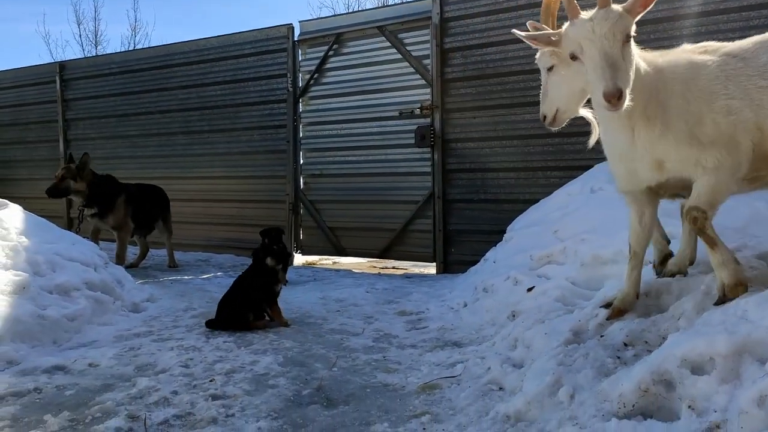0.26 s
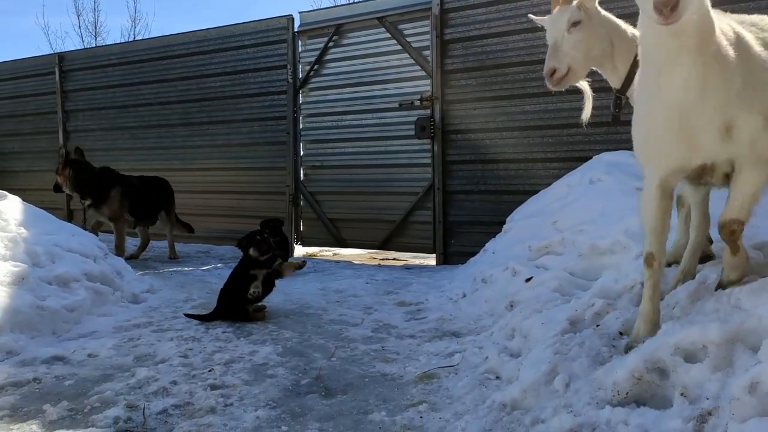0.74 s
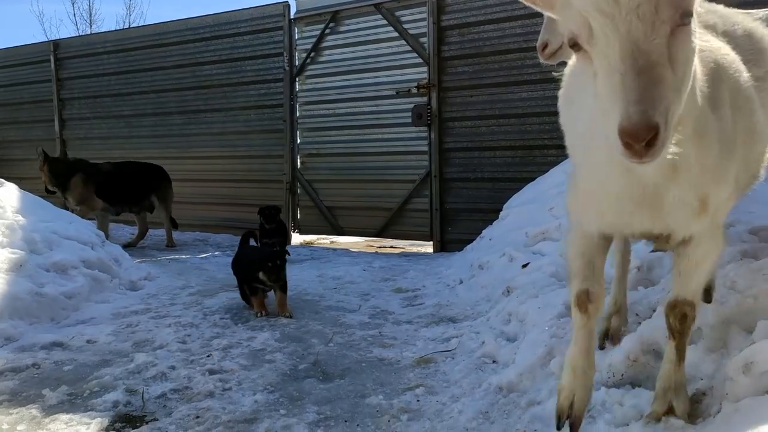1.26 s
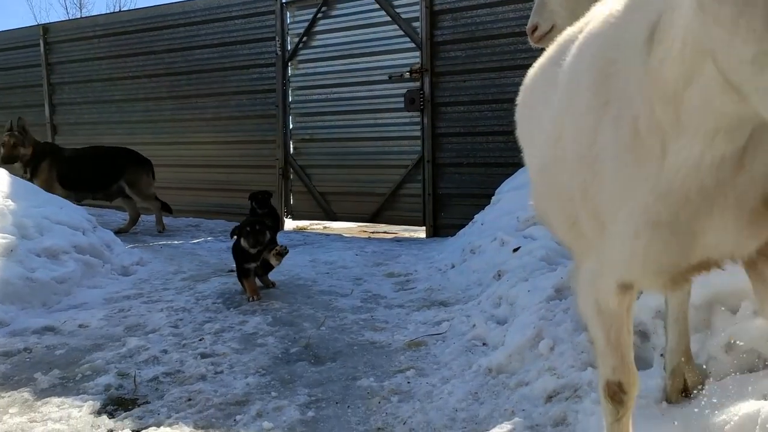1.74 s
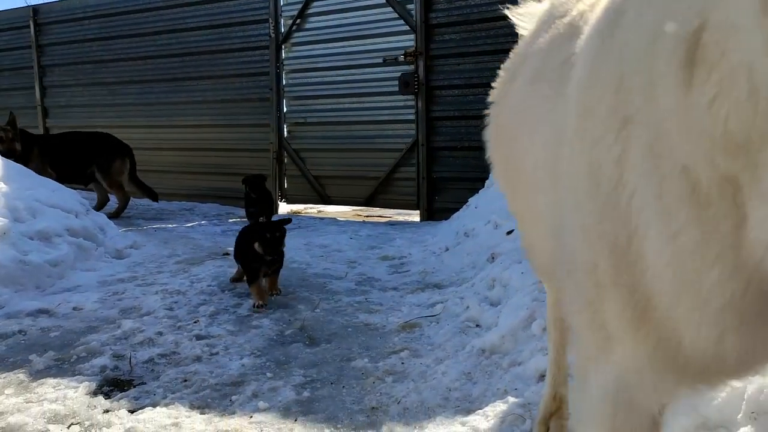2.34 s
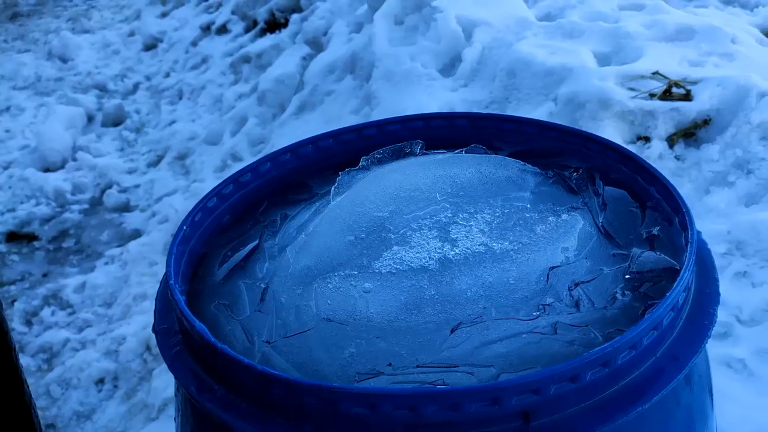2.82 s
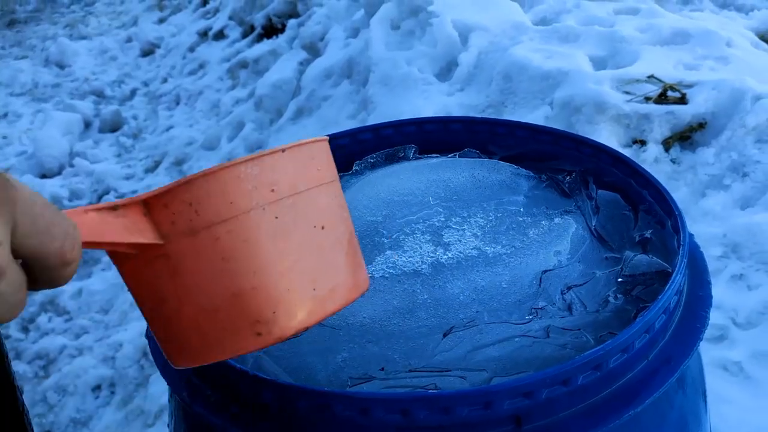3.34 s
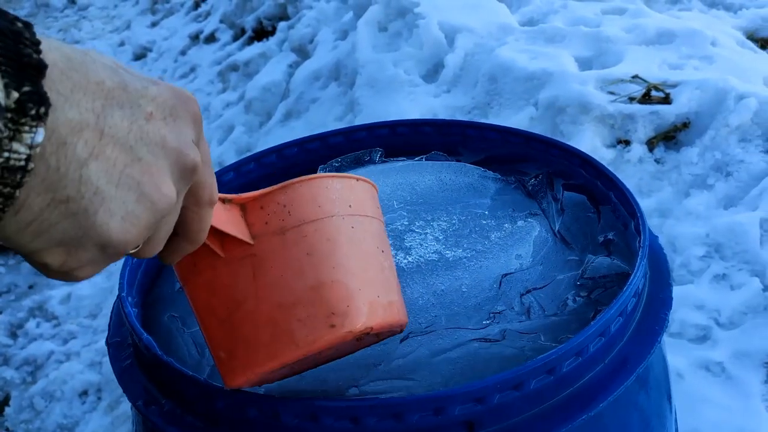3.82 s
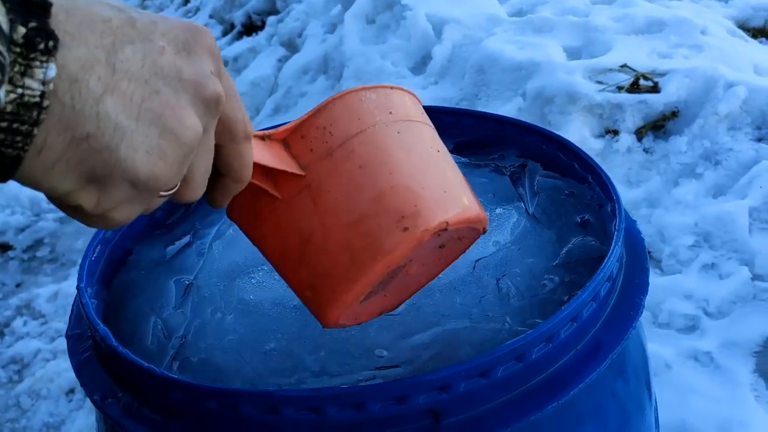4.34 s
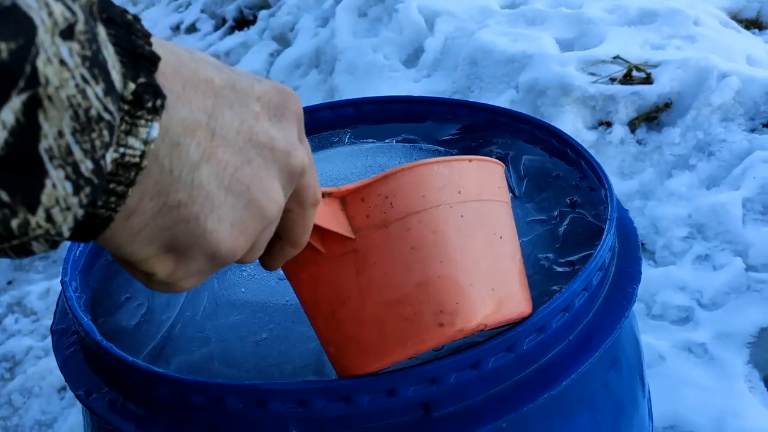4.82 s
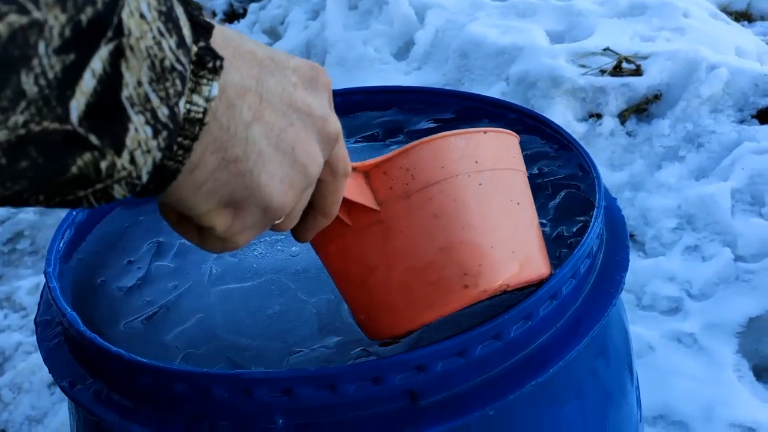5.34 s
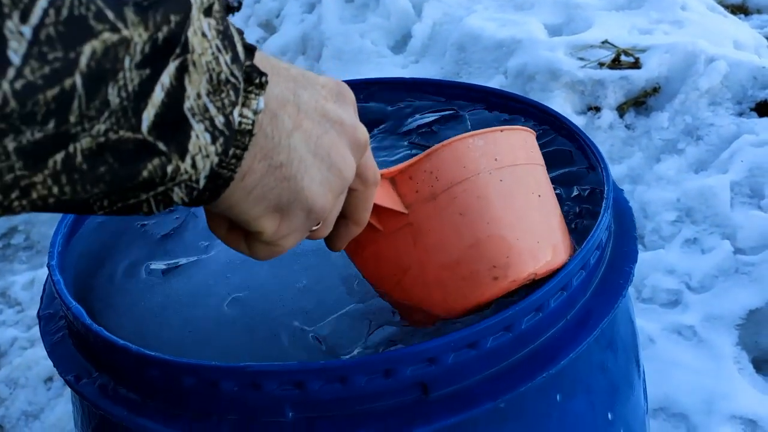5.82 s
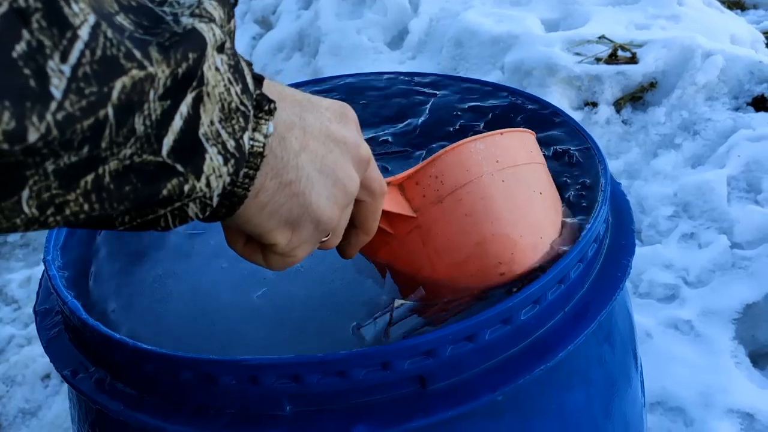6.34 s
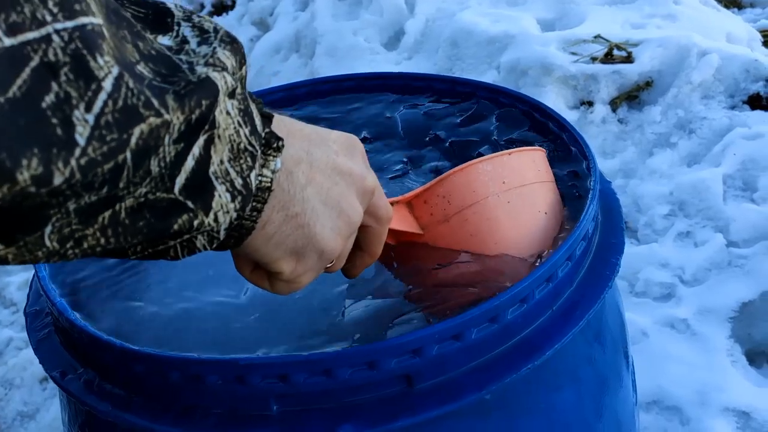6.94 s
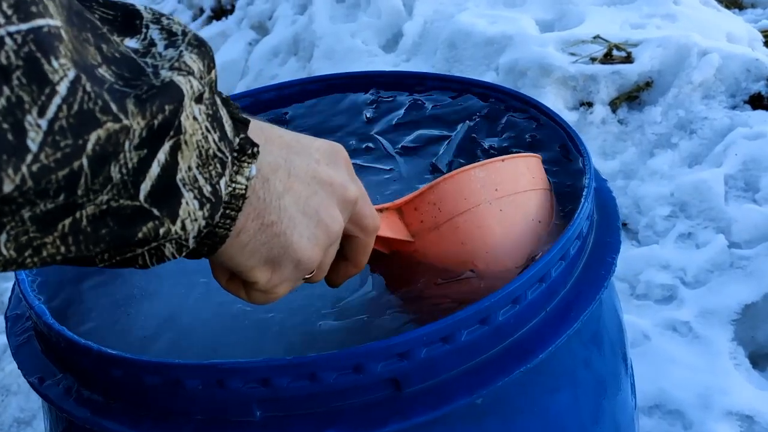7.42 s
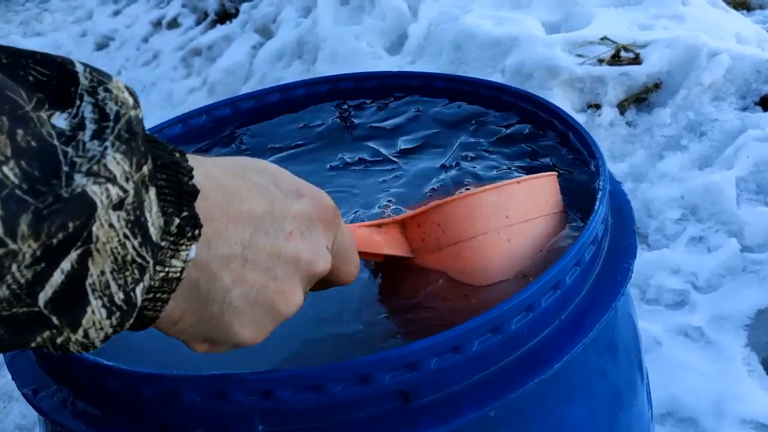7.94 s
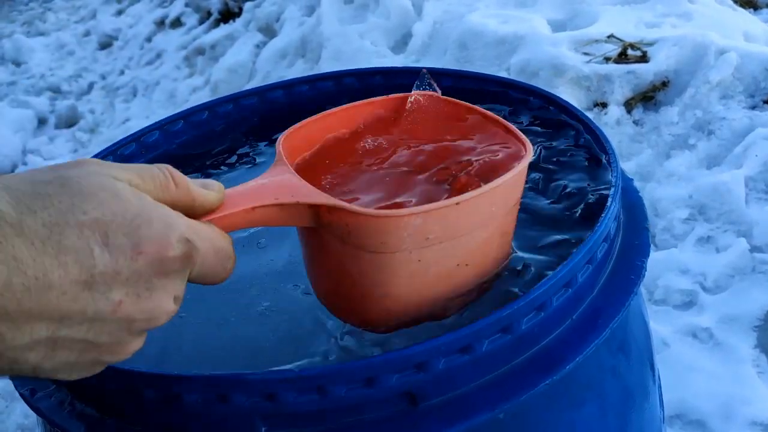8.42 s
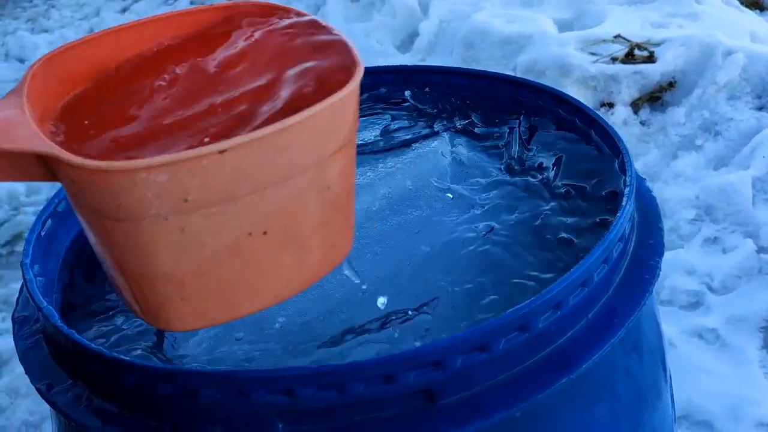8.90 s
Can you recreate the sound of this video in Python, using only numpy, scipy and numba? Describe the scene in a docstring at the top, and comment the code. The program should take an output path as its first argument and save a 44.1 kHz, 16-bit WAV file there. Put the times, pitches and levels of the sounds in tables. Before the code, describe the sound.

Dogs whine thinly as a goat crunches through snow and brushes the microphone; then a plastic scoop knocks, cracks barrel ice and fills with gurgling water.

```python
"""A plastic scoop knocks on thin ice in a water barrel, breaks it, and sinks among crackling shards.
Tiny fractures excite its hollow, plastic wall and the ice edge; the hollow's pitch climbs as water fills it, then
falls back among bubbles and drips as it is lifted out. Before that, and a brief silence, a goat crunches up
through snow in grains of noise and brushes past the left microphone, while dogs whine in gliding overtones.
Faint yard air and light wind on the microphones lie behind it all."""
import sys
import numpy as np
from scipy import signal
from scipy.fft import rfft, irfft
from scipy.io import wavfile
from scipy.ndimage import uniform_filter1d
from numba import njit

SR = 44100
rng = np.random.default_rng(int(sys.argv[2]) if len(sys.argv) > 2 else 0)


def bounce(signal):
    """Save signal as a 16-bit WAV file at the path given by the first command-line argument."""
    frames = np.transpose(np.atleast_2d(signal))
    limited = np.clip(frames, -1, 1)
    pcm = np.round(limited * 32767).astype(np.int16)
    wavfile.write(sys.argv[1], SR, pcm)


N = 404397
TIME = np.arange(N) / SR  # s

# the hollow as water fills the scoop: t/s, pitch f/Hz, barrel boom against hollow/dB,
# bubbles and spray against ticks/dB
FILL = [(3.6, 600, -10, -33), (4.0, 600, -3, -22), (4.18, 680, -5.5, -4), (4.5, 614, 1, -23),
        (4.63, 765, -8, -9), (4.9, 743, -5.5, -22), (5.4, 730, -1, -17), (6.15, 650, 3.5, -15),
        (6.8, 765, -11.5, -13), (7.05, 822, -9.5, -4), (7.3, 980, -41, -2.5), (7.6, 1220, 9.5, -7),
        (8.15, 1427, 8, -2.5), (8.5, 1123, 20, -4), (9.17, 950, 13, -8)]
# the hollow is free on dry ice, damped by pressure and water: t/s, width/Hz (water widens it further),
# barrel boom against hollow/dB
DAMPING = [(3.85, 41.7, -4), (4.1, 129, -16), (4.55, 82.6, -7), (4.7, 121, -15.5), (5.8, 156, 1.5),
           (7, 121, -14.5)]
# how hard the scoop is handled and stirs shards and water: t/s, level/dB
STIR = [(2.75, -78), (3.58, -82), (3.66, -68.5), (4.4, -69), (4.95, -57), (5.45, -63), (5.62, -58.5),
        (5.69, -53), (6.15, -56), (6.6, -51.5), (6.85, -50), (7.38, -57.5), (7.85, -56), (8.26, -51),
        (8.42, -59.5), (8.74, -58), (9.07, -53), (9.115, -44), (9.17, -49)]
# the silence between goat and barrel: start t/s, end t/s
SILENCE = (2.613, 2.652)


def amp(db):
    """Decibels to gain."""
    return 10 ** (np.asarray(db) / 20)


def unit(x):
    """Scale to rms 1."""
    return x / np.sqrt(np.mean(x ** 2) + 1e-30)


def curves(table):
    """Each column after the first as a value per sample."""
    s, *columns = np.transpose(table)
    return [np.interp(TIME, s, c) for c in columns]


def add(out, s, x):
    """Mix a short sound in at time s."""
    i = max(int(s * SR), 0)
    out[..., i:i + x.shape[-1]] += x[..., :max(N - i, 0)]


def colour(x, points, size=2048):
    """Causal minimum-phase filter through (Hz, dB) points, by folding the cepstrum."""
    hz, db = np.transpose(points)
    bins = np.fft.rfftfreq(size, 1 / SR)
    cepstrum = irfft(np.log(amp(np.interp(np.log(bins + 1), np.log(hz), db))))
    cepstrum[1:size // 2] *= 2
    cepstrum[size // 2 + 1:] = 0
    impulse = irfft(np.exp(rfft(cepstrum)))
    return signal.fftconvolve(x, impulse[None], axes=1)[:, :x.shape[1]]


@njit
def svf(x, hz, width):
    """Band-pass on each channel, with a centre and width that may move."""
    y = np.empty_like(x)
    for c in range(len(x)):
        band, low = 0., 0.
        for i in range(x.shape[1]):
            g, k = np.tan(np.pi * hz[i] / SR), width[i] / hz[i]
            v = (band + g * (x[c, i] + 1e-18 - low)) / (1 + g * (g + k))
            band, low, y[c, i] = 2 * v - band, low + 2 * g * v, k * v
    return y


def ring(x, hz, width):
    """One resonance; its centre and width may move."""
    still = np.zeros(x.shape[1])
    return svf(np.ascontiguousarray(x), hz + still, width + still)


def walk(rate):
    """Slow random wander, rms 1 before trimming; about rate new values a second."""
    k = int(SR / rate)
    steps = np.repeat(rng.standard_normal(N // k + 1), k)
    return unit(uniform_filter1d(uniform_filter1d(steps, k), k)[:N])


def swell(s, hold, attack, release):
    """An envelope that rises to 1 at time s, holds and dies away."""
    before, after = np.maximum(s - TIME, 0), np.maximum(TIME - s - hold, 0)
    return np.exp(-before / max(attack, 1e-3) - after / max(release, 1e-3))


def clicks(n, rate, spread_db):
    """Random tiny fractures: row 0 is shared by both microphones, rows 1 and 2 differ from it in polarity."""
    count = max(int(rate * n / SR), 1)
    out = np.zeros((3, n))
    sizes = amp(spread_db * np.minimum(rng.exponential(size=count), 4))
    out[:, rng.integers(0, n, count)] = sizes * rng.choice([-1, 1], (3, count))
    return unit(out)


def pair(x, apart):
    """Left and right from a shared row and two own rows; apart is the power share of the own rows."""
    apart = np.clip(apart, 0, 1)
    return np.sqrt(1 - apart) * x[:1] + np.sqrt(apart) * x[1:]


def smear(x, s):
    """Scatter inside the barrel spreads each tick into a short burst of noise."""
    keep = np.exp(-1 / (max(s, 1e-4) * SR))
    power = signal.lfilter([1], np.poly([keep, keep]), x[0] ** 2)
    return unit(np.sqrt(np.abs(power)) * rng.standard_normal(x.shape))


def scoop(push, thrust, hz, width, barrel_db, place, scatter_s=0.0011):
    """What rings, each at rms 1: hollow with barrel boom, driven by thrust and push; wall and ice edge by the push."""
    # ringing of the plastic wall: f/Hz, width/Hz, level/dB
    wall_modes = [(1440, 135, 7), (1675, 94, 9), (1916, 100, 10), (2226, 370, 1.5), (2750, 230, 2),
                  (3530, 920, -5)]
    # colour of the snapping ice edge: f/Hz, level/dB
    edge_colour = [(1500, -43.5), (2600, -2.5), (3400, 6), (5800, 0), (7000, -8), (10000, -10.5),
                   (12500, -18.5), (15000, -29)]
    # colour of the barrel's boom: f/Hz, level/dB
    barrel_colour = [(70, -41), (130, -13), (200, -1.5), (330, 4.5), (600, 8.5), (1500, 3.5), (4000, -63)]
    scattered = smear(push, scatter_s)
    hollow = unit(ring(ring(pair(thrust, 0.011), hz, width), hz, 290))
    boom = unit(colour(pair(scattered, 0.12), barrel_colour))
    flexing = ring(pair(push + .5 * scattered, 0.2), 2700, 3000)
    shift = np.exp(0.02 * place)  # the wall's pitch shifts with the place of contact
    wall = 0
    for k, (f, w, db) in enumerate(wall_modes):
        wall = wall + (-1) ** k * amp(db) * ring(flexing, f * shift, w)
    edge = colour(pair(scattered + .5 * push, 0.98), edge_colour)
    return unit(hollow + amp(barrel_db) * boom), unit(wall), unit(edge)


def blows():
    """Knocks and cracks as (s, Hz, hollow dB, wall dB, edge dB, crumble s); sharper cracks: more edge, less hollow."""
    # the scoop knocking: two faint taps as it is handled, then its base on ice: t/s, hollow pitch f/Hz, hollow
    # level/dB, wall level/dB, crumble scale/s
    knocks = [(2.803, 725, -65.5, -84, 0.002), (3.495, 735, -65, -64.5, 0.0031),
              (3.61, 620, -28, -41.5, 0.0033), (3.747, 607, -47, -50, 0.0039),
              (3.852, 556, -45.5, -45.5, 0.0035), (3.975, 566, -56.5, -65, 0.0012),
              (4.101, 525, -38, -77, 0.0013), (4.21, 724, -40.5, -49.5, 0.012),
              (4.496, 580, -35, -49, 0.00079), (4.52, 626, -34.5, -47, 0.001),
              (4.527, 615, -52, -45, 0.0014), (4.534, 580, -26, -43.5, 0.0023),
              (4.553, 770, -32, -49, 0.0011), (4.579, 633, -29.5, -43, 0.0031),
              (5.15, 610, -49, -54.5, 0.0016), (5.241, 302, -51, -52, 0.00087)]
    # ice cracking, and loose pieces or drops striking the scoop: t/s, level/dB, sharpness/dB, crumble scale/s
    ice_cracks = [(4.158, -42, -5, 0.002), (4.169, -45.5, -19, 0.0025), (4.6, -38.5, -5, 0.0073),
                  (4.615, -29.5, -12.5, 0.0037), (4.631, -36, -7, 0.0034), (4.651, -38, -0.5, 0.005),
                  (4.669, -38, 0.5, 0.0017), (4.706, -48.5, -2, 0.0017), (4.791, -47, -6.5, 0.0017),
                  (4.858, -47, -10, 0.0046), (4.901, -48, -20, .0013), (4.924, -45.5, -1, 0.0023),
                  (5.069, -49.5, -9.5, 0.014), (5.638, -67, 20.5, 0.0017), (5.699, -45.5, -10.5, 0.0012),
                  (5.71, -37, 1.5, 0.0078), (5.729, -41.5, 2, 0.0031), (5.806, -52.5, -10, .0012),
                  (5.83, -52, 4, .006), (5.847, -42, -4, 0.0067), (5.904, -45, -5, 0.015),
                  (5.922, -47, 11, 0.0052), (6.075, -50.5, 7, 0.0025), (6.105, -58.5, 12, 0.0025),
                  (6.163, -59, 10, 0.0025), (6.277, -50, -1.5, 0.0048), (6.475, -48, -1, 0.001),
                  (6.706, -46, -3, 0.0012), (6.745, -40, -5, 0.0073), (6.759, -38, -6, 0.0015),
                  (6.822, -42, -9, 0.0025), (6.835, -42.5, -20.5, 0.0041), (6.856, -45, -5.5, 0.011),
                  (6.92, -40, -15, 0.0031), (6.96, -46.5, -1.5, 0.0037), (7.04, -47, -4, 0.0021),
                  (7.233, -49, -7, 0.0031), (7.319, -45.5, -10, 0.0057), (7.582, -51.5, -6, 0.0026),
                  (7.674, -55.5, 3.5, 0.0027), (7.932, -47.5, -3, 0.00077), (8.18, -48.5, -5, 0.0026),
                  (8.32, -48.5, 16.5, 0.00091), (8.79, -47, -4.5, 0.014), (8.858, -52, -15, 0.004),
                  (9.093, -47.5, 10, 0.00088), (9.142, -40.5, 1, 0.00094)]
    knock_edge_db = -9  # against the wall
    crack_hollow_db, crack_edge_db = -2.5, -3.5  # against the wall, at sharpness 0
    hollow_per_sharp = 0.52  # dB that the hollow loses per dB of sharpness
    pitch_scatter = 0.096  # log spread of the hollow's pitch from crack to crack
    fill_hz = curves(FILL)[0]
    rows = [(s, hz, hollow, wall, wall + knock_edge_db, crumble) for s, hz, hollow, wall, crumble in knocks]
    for (s, db, sharp, crumble), chance in zip(ice_cracks, rng.standard_normal(len(ice_cracks))):
        hz = fill_hz[int(s * SR)] * np.exp(pitch_scatter * chance)
        hollow = db + crack_hollow_db - hollow_per_sharp * sharp
        rows.append((s, hz, hollow, db, db + crack_edge_db + sharp, crumble))
    return rows


def cracks():
    """Each blow is one snap and a dying spray of fractures; a short one shoves the hollow as a single blow."""
    out, n = np.zeros((2, N)), SR // 8
    t = np.arange(n) / SR
    snap = np.zeros((3, n))
    snap[0, 0] = np.sqrt(n)
    width, barrel_db = curves(DAMPING)
    for s, hz, *levels, crumble in blows():
        crumble, i = max(crumble, 1e-3), int(s * SR)
        spray = unit(clicks(n, 1400, 2.6) * np.exp(-t / (1.6 * crumble)))
        push = unit(spray + 0.69 * snap)
        thrust = spray + 0.0033 / crumble * snap
        parts = scoop(push, thrust, hz, width[i], barrel_db[i], rng.standard_normal())
        gains = amp(levels) * np.sqrt(SR / 50 / n)  # levels count the energy as if spread over 20 ms
        add(out, s, sum(g * part for g, part in zip(gains, parts)))
    return out


def jostle():
    """Gains of hollow, wall and edge: the shards move with the steady stirring and with each push."""
    # short pushes that grind the scoop into the ice: t/s, hold/s, level/dB
    pushes = [(3.636, 0.031, -60.5), (4.145, 0.039, -47), (4.591, 0.094, -47), (4.843, 0.034, -51.5),
              (5.228, 0.097, -64)]
    # tone as the scoop goes under and comes out: t/s, hollow against wall/dB, sharp edge against wall/dB
    stir_tone = [(3.6, 11, 0), (4.8, 8.5, -7), (5.5, 3, -3), (6.2, 7, -4.5), (6.6, 6, -6), (7.28, 14.5, -6),
                 (7.5, -11, -11.5), (8.15, -6.5, -0.5), (8.6, -10.5, 2.5), (9.15, -6, 4.5)]
    attack_s, release_s = 0.018, 0.024
    effort = amp(curves(STIR)[0])
    for s, hold, db in pushes:
        effort = effort + amp(db) * swell(s, hold, attack_s, release_s)
    hollow_db, edge_db = curves(stir_tone)
    return effort * amp(hollow_db), effort, effort * amp(edge_db)


def clink(hz):
    """A shard rings for a few cycles in two modes, choked by the water."""
    swell_s, overtone, overtone_db = 0.0012, 1.913, -11.5  # swell and decay time; ratio and level of mode two
    t = np.arange(SR // 50) / SR
    age, phase = t / max(swell_s, 1e-4), 2 * np.pi * hz * t
    modes = np.sin(phase) + amp(overtone_db) * np.sin(overtone * phase)
    return age * np.exp(1 - age) * modes


def bubble(hz, t60, rise):
    """A bubble swells as it pinches off, rings and glides in pitch, mostly upward as it nears the surface."""
    birth_cycles = 0.84
    age = np.linspace(0, 1, max(int(t60 * SR), 2))
    cycles = np.cumsum(hz * (1 + rise * age)) / SR
    return np.sin(2 * np.pi * cycles) * (1 - np.exp(-cycles / birth_cycles)) * amp(-60 * age)


def gulp(hz, t60, rise):
    """One large bubble, its loudness shaken by the churning water."""
    note = bubble(hz, t60, rise)
    return note * unit(amp(3 * walk(300)[:len(note)]))


def swarm(grain, rate, low_hz, span, range_db):
    """Many grains at random moments, pitched from low_hz up to span times that; few are loud."""
    out, low_hz = np.zeros((2, N)), low_hz + np.zeros(N)
    for when, pitch, size, side in rng.random((int(rate * N / SR), 4)):
        ports = np.array([[1.3 - side], [0.2 + side]])
        note = grain(low_hz[int(when * N)] * span ** pitch)
        add(out, when * N / SR, amp(range_db * size ** 3) * ports * note)
    return unit(out)


def sloshes(count=28):
    """Each slosh folds air under: a quick gurgling run of bubbles around one pitch."""
    # water lapping over the rim and back into the barrel: t/s, length/s, bubble pitch f/Hz, level/dB
    laps = [(6.995, 0.073, 1104, -46), (7.259, 0.085, 1440, -48.5), (7.577, 0.073, 1440, -52.5),
            (7.772, 0.05, 1130, -56.5), (8.045, 0.068, 1800, -48), (8.176, 0.1, 1600, -49.5),
            (8.325, .04, 1380, -52.5), (8.43, 0.092, 1067, -54.5)]
    octaves, ring_cycles, rise = 0.31, 36, 0.15  # pitch spread, cycles to fall 60 dB, upward glide as a share
    out = np.zeros((2, N))
    for s, length, hz, db in laps:
        run = np.zeros((2, N))
        draws = zip(rng.random((count, 3)), rng.standard_normal(count))
        for k, ((late, size, side), pitch) in enumerate(draws):
            f = hz * 2 ** (octaves * pitch)
            ports = np.sqrt([[1 - side], [side]])
            note = bubble(f, ring_cycles / f, rise)
            add(run, s + length * (k + late) / count, amp(-10 * size) * ports * note)
        out += amp(db) * unit(run) * np.sqrt(length * SR / N)
    return out


def water(wall_db=-1.5, edge_db=1, spray_db=-1):
    """Loose shards tick and clink against the scoop; bubbles and spray take over as it fills and drips."""
    # single shards clinking: t/s, pitch f/Hz, level/dB
    shard_notes = [(4.858, 1910, -28.5), (4.894, 1770, -35), (4.972, 2700, -42.5), (5.009, 590, -42),
                   (5.034, 770, -42), (5.277, 950, -42), (5.335, 620, -45), (5.700, 1870, -29),
                   (5.770, 744, -34), (5.781, 780, -34), (5.806, 2500, -38), (5.819, 750, -33),
                   (5.847, 1830, -24), (6.285, 770, -37), (6.437, 1890, -38.5), (6.497, 1940, -36),
                   (6.821, 2820, -33), (7.143, 980, -35.5), (7.232, 1380, -31), (8.25, 3850, -33.5),
                   (9.101, 4660, -32), (9.142, 897, -22.5)]
    # air gulping under the rim, and drops plopping: t/s, pitch f/Hz, level/dB, t60/s, pitch rise as a share
    gulps = [(6.940, 2640, -26, 0.03, 0.14), (7.095, 910, -35, 0.077, 0.022),
             (7.168, 774, -29, 0.061, -0.13), (7.267, 961, -38, 0.22, -0.021),
             (7.473, 1320, -35.5, .027, 0.12), (7.506, 856, -38, 0.035, 0.14),
             (7.582, 1375, -42, .053, -0.047), (7.715, 1004, -41, 0.086, 0.53),
             (7.742, 191, -40.5, 0.064, 1), (8.208, 2120, -32, 0.024, .2), (8.325, 1520, -32, 0.051, -.15),
             (8.432, 824, -36, 0.024, -0.048), (8.623, 2350, -34.5, .03, 0.85),
             (8.79, 920, -35, 0.032, 0.14), (8.965, 2200, -35.5, 0.022, 0.17)]
    hollow, wall, edge = jostle()
    hz, barrel_db, share_db = curves(FILL)
    width = 1.59 * curves(DAMPING)[0]
    push = unit(clicks(N, 700, 3.38) * amp(2.1 * walk(45)))
    parts = scoop(push, push, hz + 0.37 * width * walk(25), width, barrel_db, walk(30))
    ticks = hollow * parts[0] + amp(wall_db) * wall * parts[1] + amp(edge_db) * edge * parts[2]
    shards = amp(-3) * wall * swarm(clink, 260, 1000, 3.2, 13)
    bubbles = amp(3) * wall * swarm(lambda f: bubble(f, 36 / f, 0.12), 170, .74 * hz, 2.6, 15)
    spray = amp(spray_db) * edge * swarm(lambda f: bubble(f, 50 / f, 0.06), 260, 2600, 2.2, 19)
    wet = amp(share_db)
    out = (ticks + shards + wet * (bubbles + spray)) / np.sqrt(1 + wet ** 2) + sloshes()
    for s, f, db in shard_notes:
        add(out, s, amp(db) * clink(f))
    for s, f, db, t60, rise in gulps:
        add(out, s, amp(db) * gulp(f, t60, rise))
    return out * (TIME > STIR[0][0])


def echoes(x, echo_db=-19, t60=0.14):
    """The barrel and nearby walls return a short, dull tail of decaying noise."""
    t = np.arange(SR // 2) / SR
    tail = rng.standard_normal((2, len(t))) * amp(-60 * t / t60) * (1 - np.exp(-t / 0.0051))
    tail = colour(tail, [(200, -26.5), (700, -13.5), (4000, -14.0), (12000, -20.5)])
    return amp(echo_db) * signal.fftconvolve(x, unit(tail) / np.sqrt(len(t)), axes=1)[:, :N]


def hooves(tread_db=6.0, snap_db=-18, shuffle_db=-74, squeak_db=0, settle_s=0.028, settle_db=-9):
    """Snow crushes in tiny jerks under each hoof, squeaking in changing patches; at times the crust snaps."""
    # hooves pressing snow: t/s, length/s, level before tread_db/dB, low crunch against high/dB
    treads = [(0.501, 0.15, -64, 1), (0.752, 0.11, -53.5, 4), (0.853, 0.053, -57, -2),
              (0.934, 0.034, -69.5, 5), (1.02, 0.075, -57, -1), (1.152, 0.097, -57, 3.5),
              (1.25, 0.071, -56, 2), (1.382, 0.12, -54, -3), (1.491, 0.13, -63.5, 2),
              (1.631, 0.057, -58, 4), (1.714, 0.052, -56, 0), (1.785, 0.049, -44, -12),
              (1.82, 0.05, -48.5, -6), (2.118, 0.11, -59.5, -1), (2.314, 0.19, -60, -10),
              (2.557, 0.091, -56.5, 0)]
    # crust snapping under a hoof: t/s, level before snap_db/dB, crumble time/s
    crust_snaps = [(0.699, -40.5, 0.0041), (0.7134, -42, 0.011), (0.737, -47, 0.0082),
                   (1.019, -33.5, 0.0078), (1.0392, -35, 0.014), (1.113, -37, 0.028), (1.302, -39, 0.0059),
                   (1.386, -42.5, 0.013), (1.5535, -28, 0.014), (1.721, -40, 0.0044), (1.731, -30.5, 0.025),
                   (1.981, -40.5, 0.021), (2.017, -39, 0.0043), (2.062, -33, 0.021), (2.196, -36.5, 0.0019),
                   (2.318, -33, 0.02), (2.602, -43, 0.0036)]
    # colour of crushed snow: f/Hz, level/dB
    snow_colour = [(59, -56), (100, -14), (304, -4.5), (558, -1.5), (2520, -3), (3390, -1.5), (4640, -1),
                   (7000, -6.5), (11000, -8), (14100, -20.5), (15000, -35)]
    # centres that the squeaking patches wander about: f/Hz
    squeak_centres = [2570, 4040, 5640, 7730]
    pressure = amp(shuffle_db) * np.clip(TIME / 0.49, 0, 1)
    low_pressure = pressure.copy()
    for s, length, db, low_db in treads:
        age = np.linspace(0, 1, max(int(length * SR), 2))
        step = amp(db) * np.abs(np.sin(np.pi * age ** 0.74)) ** 0.75
        add(pressure, s, step)
        add(low_pressure, s, step * amp(low_db))
    # loose snow keeps settling for a moment after each step
    keep = np.exp(-1 / (settle_s * SR))
    pressure, low_pressure = (p + amp(settle_db) * signal.lfilter([1 - keep], [1, -keep], p)
                              for p in (pressure, low_pressure))
    jerks = amp(2 * walk(350))
    grains = colour(pair(clicks(N, 3500, 2.8), 0.78) * jerks, snow_colour)
    squeaks = 0
    for hz in squeak_centres:
        squeaks = squeaks + ring(grains, hz * 2 ** (.15 * walk(30)), 450) * amp(5 * walk(90))
    crunch = unit(unit(grains) + amp(squeak_db) * unit(squeaks))
    low = signal.sosfiltfilt(signal.butter(2, 2100, fs=SR, output="sos"), crunch)
    out = ((crunch - low) * pressure + low * low_pressure) * amp(tread_db)
    t = np.arange(SR // 20) / SR
    for (s, db, crumble), chance in zip(crust_snaps, rng.random(len(crust_snaps))):
        spray = pair(clicks(len(t), 2500, 2.3), 0.77) * np.exp(-t / max(crumble, 1e-3))
        snap = colour(spray, snow_colour)
        snap = snap + 0.5 * ring(snap, 700 * 8 ** chance, 700)
        add(out, s, amp(db + snap_db) * unit(snap))
    # the crunch reaches the right port 9 samples later
    out[1] = np.roll(out[1], 9)
    return out * (TIME < SILENCE[0])


def brush(right_db=-24):
    """The goat's coat buffets the left port: a thud that turns into a rasp, faint in the right."""
    # the coat's contact: t/s, level/dB, brightness/dB
    contact = [(2.425, -59, 9), (2.445, -23.5, -12.5), (2.46, -17, -14), (2.478, -22.5, 0.5),
               (2.508, -22.5, 6.5), (2.533, -26, 2), (2.548, -45, 2)]
    # colour of the thud: f/Hz, level/dB
    thud_colour = [(30, -21), (150, -4), (240, 5), (340, 2.5), (550, -10), (1200, -26), (4000, -64.5)]
    # colour of the rasp: f/Hz, level/dB
    rasp_colour = [(100, -29), (300, 2), (1000, -5), (2500, -17.5), (5000, -24), (14000, -46.5)]
    db, bright_db = curves(contact)
    thud, rasp = (unit(colour(pair(clicks(N, 5000, 1.8), 1.0), c)) for c in (thud_colour, rasp_colour))
    sound = (thud + 1.52 * amp(bright_db) * rasp) / np.sqrt(1 + 2 * amp(2 * bright_db))
    touching = (TIME > contact[0][0]) * (TIME < contact[-1][0])
    return sound * amp(db) * amp([[0], [right_db]]) * touching


def whine(s, length, first_hz, last_hz, db, onset_db=-18):
    """One whine as (s, Hz, dB) points: it starts quickly, glides to its last pitch and fades."""
    attack_s, fade_db_per_s, glide_share = 0.02, 52, 0.55  # glide ends at this share of the length
    ages = np.sort([0, attack_s, np.clip(glide_share, 0, 1) * length, length])
    levels = db - fade_db_per_s * ages + [onset_db, 0, 0, 0]
    return list(zip(s + ages, [first_hz, first_hz, last_hz, last_hz], levels))


def dog(call, second_db, third_db, husk_db=-19):
    """A thin, wavering whine through the nose; overtones come and go, with a husky noise band at its pitch."""
    hz, db = curves(call)
    phase = 2 * np.pi * np.cumsum(hz * (1 + .007 * walk(110))) / SR
    overtones = amp(second_db) * np.sin(2 * phase) + amp(third_db) * np.sin(3 * phase)
    overtones = overtones * amp(3 * walk(60))
    husk = unit(ring(rng.standard_normal((2, N)), hz, 260))
    voice = unit(np.sin(phase) + overtones) + amp(husk_db) * husk
    calling = (TIME > call[0][0]) * (TIME < call[-1][0])
    return voice * amp(db + 2.6 * walk(80)) * calling


def catches(upper_db=-4, attack_s=0.014, release_s=0.032):
    """The voice breaks into a rough band at its pitch and a fainter one about an octave up."""
    # hoarse catches in the dog's throat: t/s, pitch f/Hz, level/dB
    hoarse = [(1.92, 553, -61), (2.29, 427, -58)]
    out = 0
    for s, hz, db in hoarse:
        noise = rng.standard_normal((1, N))
        low, high = (unit(ring(ring(noise, f, 260), f, 260)) for f in (hz, 2.07 * hz))
        out = out + amp(db) * (low + amp(upper_db) * high) * swell(s, 0, attack_s, release_s)
    return out


def outdoors(air_db=-2):
    """Faint far-off wash as coloured noise, and light wind rumbling on each port as low bands of noise, with
    one low thump of the barrel."""
    # colour of the yard: f/Hz, level/dB
    yard_colour = [(76, -31), (130, -13), (255, -8), (512, -3.5), (793, -11), (1590, -10.5), (7480, -19.5),
                   (13100, -22.5), (15000, -29.5)]
    # outdoor air: t/s, level before air_db/dB
    air_level = [(0, -67), (2.68, -79), (2.8, -69.5), (4.3, -66), (9.17, -66.5)]
    # puffs of wind on the ports, and a low thump as the barrel is bumped at 7.76 s: t/s, level/dB, dying time/s
    rumbles = [(2.72, -68, 0.61), (4.8, -58, 0.064), (7.76, -55, 0.1)]
    breeze_db, gust_rise_s = -76.5, 0.064
    air = unit(colour(pair(rng.standard_normal((3, N)), 0.78), yard_colour))
    air = air * amp(curves(air_level)[0] + air_db + walk(7.2))
    wind = unit(ring(ring(rng.standard_normal((2, N)), 21, 39), 32, 100))
    force = amp(breeze_db)
    for s, db, dying in rumbles:
        force = force + amp(db) * swell(s, 0, gust_rise_s, dying)
    return air + wind * force * amp(0.68 * walk(9))


def scene():
    """The barrel with its echoes, the goat, the dogs and the yard."""
    # high whines, each gliding and fading: t/s, length/s, first pitch f/Hz, last pitch f/Hz, level/dB
    whines = [(0.151, 0.235, 2890, 2650, -51), (0.385, 0.038, 2770, 2850, -62),
              (0.431, 0.22, 2636, 2560, -55), (0.658, 0.1, 2580, 2605, -55)]
    # a low whimper: t/s, pitch f/Hz, level/dB
    whimper = [(1.8, 650, -61), (1.835, 803, -57), (1.865, 733, -51), (1.905, 606, -42.5),
               (1.925, 593, -54), (1.95, 545, -82)]
    # a low moan: t/s, pitch f/Hz, level/dB
    moan = [(2.275, 399.7, -65), (2.303, 527, -57), (2.32, 539, -40), (2.35, 566, -40.5), (2.39, 586, -52),
            (2.43, 569, -50.5), (2.555, 565, -43.5), (2.595, 539, -49), (2.615, 482, -58)]
    barrel = cracks() + water()
    dogs = sum(dog(whine(*row), -10, -30) for row in whines)
    dogs = dogs + dog(whimper, -21, -45) + dog(moan, -34, -31) + catches()
    return barrel + echoes(barrel) + hooves() + brush() + dogs + outdoors()


def record(dry):
    """Two unlike microphones, a moment of silence between goat and barrel, and a steep cut of the top."""
    # left microphone against right, split evenly between them: f/Hz, level/dB
    left_mic = [(100, -2), (600, 0), (2300, -2.5), (4400, -2.5), (6300, -8.5), (8200, -9.5), (10500, -7),
                (14000, 0)]
    top_hz = 14850
    left = colour(dry[:1], [(hz, db / 2) for hz, db in left_mic])
    right = colour(dry[1:], [(hz, -db / 2) for hz, db in left_mic])
    left = np.roll(left, 2, axis=1)  # sound reaches the left port 2 samples later
    audible = (TIME < SILENCE[0]) | (TIME > SILENCE[1])
    both = np.vstack([left, right]) * audible
    return signal.sosfilt(signal.ellip(10, .2, 70, top_hz, fs=SR, output="sos"), both)


dry = scene()
out = record(dry)
bounce(out)
```